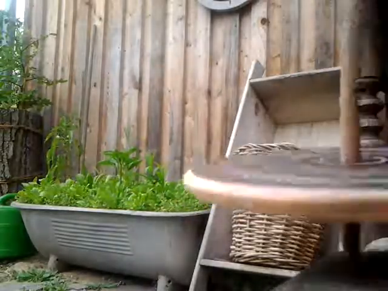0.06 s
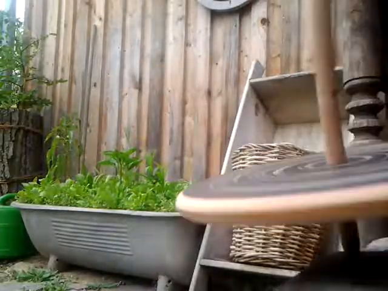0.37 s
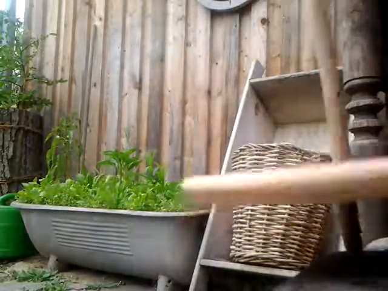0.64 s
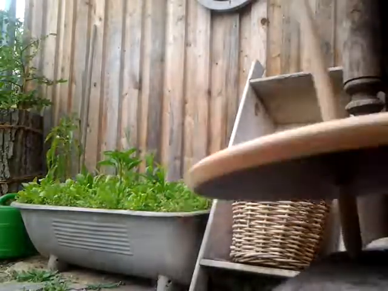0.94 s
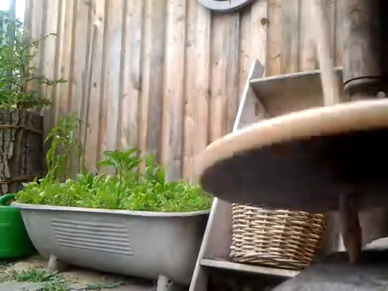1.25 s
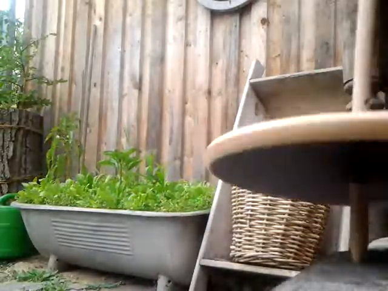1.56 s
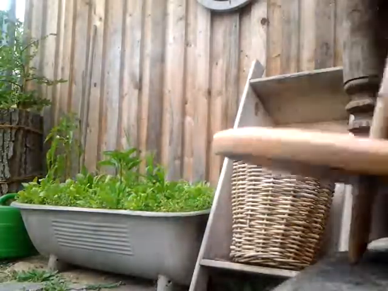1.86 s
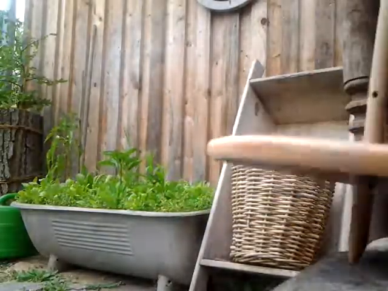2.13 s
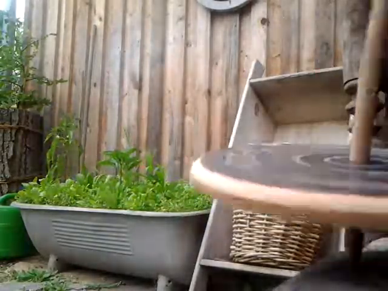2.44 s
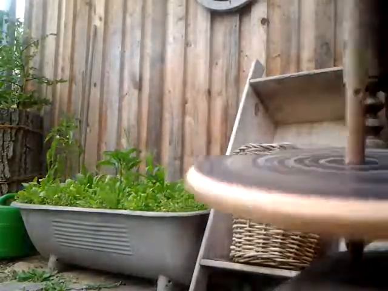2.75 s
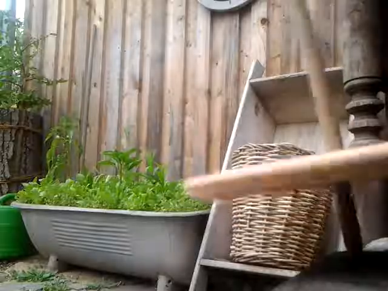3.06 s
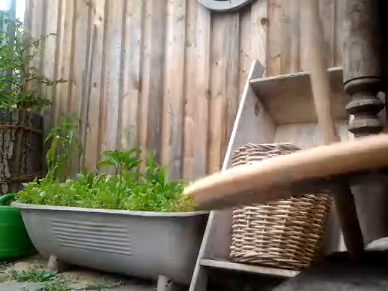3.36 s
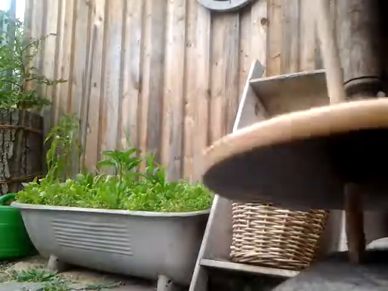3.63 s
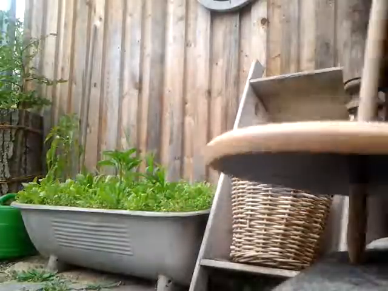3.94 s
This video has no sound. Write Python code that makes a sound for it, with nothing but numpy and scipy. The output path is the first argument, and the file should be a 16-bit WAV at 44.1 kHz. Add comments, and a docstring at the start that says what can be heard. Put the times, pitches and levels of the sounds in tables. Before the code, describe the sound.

Close up in a quiet garden, a spinning wooden top rasps and knocks unevenly on a hollow wooden seat. The knocking gradually eases while the scraping continues, and a faraway bird faintly sings four falling notes.

```python
"""Hollow knocks and a pulsing scrape, close by: a large wooden top wobbles on a wooden garden seat.
Friction over the grain excites the resonances of top and board once or twice a turn, about nine turns
a second. The tip also skips, and each impact rings the board; the knocks thin out as the top settles.
In the quiet air a distant bird whistles once at the start and sings four falling notes near the end."""
import sys
import numpy as np
from scipy import signal
from scipy.io import wavfile
from scipy.ndimage import uniform_filter1d, map_coordinates

SR = 44100
rng = np.random.default_rng(int(sys.argv[2]) if len(sys.argv) > 2 else 0)


def file_out(sig):
    """Save sig as 16-bit WAV at sys.argv[1]."""
    # one column per channel
    cols = np.atleast_2d(sig).T
    # limit, then scale
    lim = np.clip(cols, -1, 1)
    pcm = np.round(lim * 32767).astype(np.int16)
    wavfile.write(sys.argv[1], SR, pcm)


N = 176400
T = np.arange(N) / SR
HZ = np.fft.rfftfreq(8192, 1 / SR)

# Response of the hollow board under the tip: f/Hz, relative level/dB
HOLLOW_RESPONSE = [(150, -30), (290, 0.5), (360, -9.5), (440, -7.5), (535, 4.5), (660, -5), (850, -17.5),
                   (1300, -31.5), (3000, -61)]


def amp(db):
    """Amplitude ratio of a level in decibels."""
    return 10 ** (np.asarray(db) / 20)


def unit(x):
    """Normalisation to an rms of one."""
    return x / np.sqrt(np.mean(x ** 2) + 1e-20)


def add(mix, start, sound):
    """Superposition: a sound joins the mix at its start time."""
    part = mix[max(round(start * SR), 0):][:len(sound)]
    part += sound[:len(part)]


def spectrum(points):
    """Spectral envelope in dB, interpolated over logarithmic frequency."""
    hz, db = np.transpose(points)
    return np.interp(np.log(HZ + 1), np.log(hz), db)


def colour(x, db):
    """Source and filter: x drives a minimum-phase response of unit energy, shaped like db."""
    log_gain = np.log(amp(np.r_[db, db[-2:0:-1]]))
    ring = np.fft.ifft(np.exp(np.conj(signal.hilbert(log_gain)))).real[:len(HZ)]
    return signal.oaconvolve(x, ring / np.linalg.norm(ring))[:len(x)]


def resonate(x, hz, width):
    """Forced vibration of a unit-gain resonator whose tuning follows the curve hz."""
    turn = np.exp(2j * np.pi * np.cumsum(hz) / SR)
    pole = np.exp(-np.pi * width / SR)
    return 2 * (turn * signal.lfilter([1 - pole], [1, -pole], x / turn)).real


def garden_air():
    """Ambient noise: steady, broadband and strongest in the bass."""
    # Spectrum of the air: f/Hz, relative level/dB
    ambience = [(15, 0), (40, 12), (80, -2.5), (170, 1.5), (270, -10), (550, -5), (1200, -9), (3000, -10.5),
                (7000, -33)]
    return amp(-57.5) * colour(rng.standard_normal(N), spectrum(ambience))


def reflections(x, per_s=2000, t60_s=.41):
    """Reverberation: fence and furniture return dense echoes that decay exponentially."""
    t = np.arange(SR // 3) / SR
    taps = rng.standard_normal(len(t)) * (rng.random(len(t)) < per_s / SR)
    taps *= (t > .005) * amp(-60 * t / t60_s)
    return signal.oaconvolve(x, taps / np.linalg.norm(taps))[:N]


def bird(flutter_db=3, flutter_s=.008):
    """Modulated pure tones: a faint whistle of even pitch and four falling glides flutter in level."""
    # Sung notes: onset t/s, level/dB
    notes = [(3.058, -55), (3.222, -52), (3.394, -54), (3.566, -54)]
    # Glide within a note: t/s, nominal f/Hz, relative level/dB
    glide = [(0, 5600, -17), (0.016, 5150, 1), (.032, 4600, 6), (.045, 3950, 2), (.06, 3300, -4),
             (.08, 2850, 3.5), (.11, 2680, -21)]
    # Opening whistle: onset t/s, duration/s, f/Hz, level/dB
    whistle = (.11, .18, 4560, -62)
    times, hz, db = np.transpose(glide)
    t, song = np.arange(0, times[-1], 1 / SR), np.zeros(N)
    for start, level_db in notes:
        pitch = np.interp(t, times, hz) * rng.uniform(.92, 1.01)
        envelope = amp(level_db + np.interp(t, times, db)) * signal.windows.tukey(len(t), .1)
        add(song, start, envelope * np.sin(2 * np.pi * np.cumsum(pitch) / SR))
    start, length, pitch, level_db = whistle
    t = np.arange(0, length, 1 / SR)
    add(song, start, amp(level_db) * np.sin(np.pi * t / length) * np.sin(2 * np.pi * pitch * t))
    flutter = unit(uniform_filter1d(rng.standard_normal(N), round(flutter_s * SR)))
    return song * amp(flutter_db * np.clip(flutter, -2, 1))


def seat_boom(load, width_hz=56.3):
    """Resonance under random forcing: the top's weight on the rough wood sets the seat booming."""
    # Drift of the resonance as the top wanders: t/s, f/Hz
    tuning = [(0, 122.3), (.55, 124.3), (1, 135.5), (1.4, 149.6), (1.8, 167.5), (2.2, 161.3), (2.55, 141),
              (2.9, 130.4), (3.5, 154), (4, 168)]
    hz, drive = np.interp(T, *np.transpose(tuning)), rng.standard_normal(N)
    ring = lambda x: resonate(resonate(x, hz, width_hz), hz, width_hz)
    return amp(-5) * ring(load * drive) / np.std(ring(drive))


def top_response():
    """Modal response in dB: the top's resonances stand out of the broad spectrum of the scrape."""
    # Spectrum of the scrape: f/Hz, relative level/dB
    rasp = [(300, -20.5), (700, -3), (1000, 0.5), (1280, -5), (1550, -1.5), (2400, 1.5), (3300, -2),
            (3800, -2.5), (4550, -7.5), (5000, 3), (5550, -2.5), (6300, -2), (7000, -5.5), (7700, -22)]
    # Modes of the top: f/Hz, width/Hz, lift/dB
    modes = [(1493, 47, 8), (1695, 74, 5.5), (1999, 70, 8), (2365, 46, 9), (2630, 23, 0), (3126, 85, 9.5),
             (3352, 110, 7.5), (5202, 360, 5), (5735, 37, 11.5), (6203, 220, 6)]
    return spectrum(rasp) + sum(db / (1 + (2 * (HZ - hz) / width) ** 2) for hz, width, db in modes)


def moving_contact(x, depth_db=3.5, patch_s=.014, patch_hz=220):
    """Modal coupling varies as the contact travels: bands of the sound come and go at random."""
    frames = signal.stft(x, nperseg=256, noverlap=192)[2]
    band, frame = np.indices(frames.shape)
    position = [band * SR / 256 / patch_hz, frame * 64 / SR / patch_s]
    patches = unit(map_coordinates(rng.standard_normal((128, 512)), position, order=3, mode="mirror"))
    gain = unit(amp(depth_db * np.clip(patches, -2, 2)))
    return signal.istft(frames * gain, nperseg=256, noverlap=192)[1][:N]


def slips(per_s=5800, spread_db=3):
    """Shot noise of friction: tiny slips over the wood grain, a few much larger than the rest."""
    size = amp(spread_db * np.minimum(rng.exponential(1, N), 4))
    return unit(size * rng.choice([-1, 1], N) * (rng.random(N) < per_s / SR))


def swell(peak_s, width_s, fall_ratio=1.85):
    """Power envelope of one drag: a rounded peak that falls more slowly than it rises."""
    u = (T - peak_s) / max(width_s, .002)
    u = np.where(u < 0, u, u / fall_ratio)
    return np.exp(2 - 2 * np.hypot(2 * u, 1))


def scraping(treble_hz=4100, rumble_lag_s=.0033):
    """Sliding friction: each drag rasps in the top, sounds the hollow board and leaves a low rumble."""
    # Drags of the tip: peak t/s, swell time/s, scrape level/dB, treble lift/dB, rumble level/dB
    drags = [(0.019, 0.031, -41.5, -13, -39), (0.065, 0.0086, -38, -5.5, -57),
             (0.099, 0.035, -43.5, -3.5, -39), (0.188, 0.02, -39.5, -1, -37.5),
             (0.237, 0.0061, -36, -19, -29), (0.306, 0.03, -38, -1.5, -32), (0.396, 0.02, -36.5, -3.7, -40),
             (0.491, 0.0023, -21, -3, -54), (0.502, 0.015, -32.5, -6.5, -34.5),
             (0.546, 0.0089, -39.5, 2, -31.5), (0.597, 0.016, -38, -2, -41.5),
             (0.652, 0.025, -43, -1.5, -47), (0.697, 0.0089, -41.5, -3, -41.5),
             (0.766, 0.025, -38.5, 0, -51), (0.863, 0.013, -40.5, -4, -39.5),
             (0.903, 0.012, -36.5, 0.5, -58), (0.977, 0.025, -44.5, -2, -36.5),
             (1.018, 0.0043, -45.4, 6, -47), (1.081, 0.015, -41.5, 3.8, -35),
             (1.187, 0.014, -36.5, -3, -34.5), (1.226, 0.008, -59, 9, -40), (1.286, 0.004, -32, 0, -58),
             (1.297, 0.016, -36.5, -3, -33), (1.299, 0.0059, -41.5, 6.5, -50),
             (1.414, 0.025, -43.5, 1, -37), (1.457, 0.0038, -34, -10, -67),
             (1.512, 0.028, -39.5, -3.5, -46.8), (1.553, 0.0076, -40, -6, -38),
             (1.631, 0.015, -37.5, -4.5, -37.5), (1.689, 0.021, -40, -2, -37.5),
             (1.727, 0.014, -41, 3, -49), (1.779, 0.022, -42, -5, -30), (1.896, 0.024, -42.5, -6, -48),
             (1.943, 0.013, -40.5, 0, -46.1), (1.998, 0.018, -39.5, -4, -36.8),
             (2.115, 0.02, -41.5, -0.5, -40.5), (2.237, 0.012, -38, -2.8, -37), (2.349, 0.009, -41, 4, -39),
             (2.466, 0.011, -38.5, -1, -37.5), (2.567, 0.02, -38, -4, -36.5), (2.695, 0.024, -43, 0.5, -42),
             (2.759, 0.016, -46.5, -0.4, -44), (2.805, 0.014, -42, -1, -37), (2.85, 0.017, -42.5, 0.5, -41),
             (2.917, 0.0085, -37.5, 0.2, -42.5), (2.963, 0.033, -44, -5, -47),
             (3.092, 0.039, -53, 2.6, -52.5), (3.192, 0.021, -43, 0, -47.5), (3.24, 0.008, -46.5, 4, -67),
             (3.311, 0.016, -40, 3, -68), (3.312, 0.003, -36.5, 2, -58), (3.429, 0.045, -46, 0.5, -45),
             (3.558, 0.0027, -32.5, 1, -61), (3.557, 0.042, -47.5, 1.5, -46), (3.65, 0.0067, -37, -15, -55),
             (3.659, 0.025, -46.5, -1.5, -40.5), (3.77, 0.026, -39.5, 1, -47),
             (3.888, 0.0095, -36.5, -5, -39), (4.007, 0.019, -32, -0.5, -58)]
    # Bass response of the board: f/Hz, relative level/dB
    bass_response = [(40, -22.5), (85, -6.5), (120, -7), (160, -8.5), (200, 0.5), (245, -14), (300, -2),
                     (380, -10.5), (900, -45.5)]
    drag, treble, load = np.zeros((3, N))
    for peak, width, db, lift_db, rumble_db in drags:
        power = amp(db) ** 2 * swell(peak, width)
        drag += power
        treble += power * amp(lift_db) ** 2
        load += amp(rumble_db) ** 2 * swell(peak + rumble_lag_s, width * 1.25)
    # Powers become amplitudes; steady contact sets a floor between the drags.
    drag, treble = np.sqrt(np.array([drag, treble]) + amp(-51) ** 2)
    load = np.sqrt(load + amp(-55) ** 2)
    friction = slips() + amp(-9.5) * slips(per_s=160)  # fine grain and coarse specks
    low = signal.sosfiltfilt(signal.butter(4, treble_hz, fs=SR, output="sos"), friction)
    rasp = moving_contact(colour(drag * low + treble * (friction - low), top_response()))
    hollow = colour(np.hypot(amp(-11.5) * drag, amp(-13) * load) * slips(), spectrum(HOLLOW_RESPONSE))
    rumble = colour(load * slips(), spectrum(bass_response))
    return amp(-4.5) * rasp + hollow + amp(-12.5) * rumble + seat_boom(load)


def knocking(rise_s=.0015, hold_s=.0012, board_rise_s=.0029, tick_decay_s=.0095, rattle_decay_s=.009):
    """Impact excitation: each landing knocks, rings the board, ticks in the top and rattles the tip."""
    # Landings of the tip: t/s, relative knock level/dB, knock f/Hz, relative tick level/dB
    landings = [(0.0257, -14.5, 607, -36), (0.0382, -27.8, 825, -56), (0.0912, -12.5, 530, -34),
                (0.1245, -29.1, 524, -55), (0.1912, -23, 514, -37.5), (0.2325, -13, 598, -31),
                (0.2488, -25, 580, -49), (0.3045, -25, 495, -35.5), (0.314, -27, 457, -56),
                (0.3176, -32, 380, -51.5), (0.3331, -32, 397, -56), (0.3457, -18, 500, -42.7),
                (0.3563, -20.5, 546, -53), (0.3684, -26, 556, -56.5), (0.3746, -23.5, 436, -42),
                (0.4995, -27, 520, -44), (0.5477, -21, 546, -40), (0.8648, -28, 563, -56),
                (0.9748, -18.5, 586, -47), (1.0831, -20, 590, -39), (1.1909, -22.5, 626, -49.5),
                (1.299, -23.5, 596, -37), (1.3977, -22, 564, -50), (1.4052, -26.5, 580, -43),
                (1.409, -32, 520, -45), (1.4339, -28, 590, -60), (1.4413, -30.5, 567, -52),
                (1.6265, -29.5, 540, -43.5), (1.7798, -16, 627, -40.5), (1.7885, -24.5, 536, -56),
                (1.7989, -19, 610, -53), (1.809, -21.5, 600, -48), (2, -18.5, 588, -41.5),
                (2.0085, -23.5, 602, -57), (2.0182, -24.8, 465, -58.5), (2.0259, -22.5, 640, -50),
                (2.1137, -24.5, 540, -46), (2.122, -54, 454, -43), (2.2391, -25.5, 550, -43.5),
                (2.2784, -29, 564, -48), (2.3515, -29.5, 470, -54), (2.3591, -25.5, 444, -44),
                (2.3926, -32.5, 486, -60), (2.4673, -28.5, 514, -53), (2.4743, -30, 450, -53),
                (2.5682, -32.5, 500, -54), (2.7987, -28.5, 505, -40), (2.8051, -29.4, 473, -53.4),
                (2.852, -34, 520, -59.8), (2.9555, -29.5, 515, -52), (3.118, -36.5, 540, -52.0),
                (3.422, -27.5, 572, -43.5)]
    # Modes of the board: f/Hz, relative level/dB, T60/s
    modes = [(130.2, -29, .2), (193.4, -27.5, 0.072), (245.4, -23, 0.058), (292, -21.5, 0.067),
             (405, -18.5, 0.087), (537.3, -17, .1), (717, -20.5, .1), (818, -25, .07), (948.5, -25.5, 0.14),
             (1120, -28.5, 0.089), (1485, -29, 0.058), (2260, -38, .05)]
    t = np.arange(SR // 4) / SR
    rise = np.sin(np.pi / 2 * np.minimum(t / rise_s, 1)) ** 2

    def mode(hz, db, t60):
        """Damped free vibration after a brief rise and hold."""
        envelope = rise * amp(db - 60 * np.maximum(t - rise_s - hold_s, 0) / t60)
        return envelope * np.cos(2 * np.pi * hz * (t - rise_s))

    rings = np.array([mode(*row) for row in modes]) * (1 - np.exp(-t / board_rise_s))
    octaves = np.log2(np.array(modes)[:, 0] / 550)
    knocks, ticks, rattle = np.zeros((3, N))
    for start, db, hz, tick_db in landings:
        tilt_db_per_octave = .52 * (db + 14)  # harder blows ring brighter
        board = amp(tilt_db_per_octave * octaves - 1.47) @ rings
        add(knocks, start, amp(db) * (mode(hz, db=-2.5, t60=.02) + board))
        add(ticks, start, amp(tick_db - .5) * rise * np.exp(-t / tick_decay_s))
        add(rattle, start, amp(db - 26) * rise * np.exp(-t / rattle_decay_s))
    lowpass_db = -10 * np.log10(1 + (HZ / 2800) ** 4)
    ticking = moving_contact(colour(ticks * slips(), top_response() + lowpass_db))
    return knocks + ticking + colour(rattle * slips(), spectrum(HOLLOW_RESPONSE))


def scene():
    """Direct and reflected sound add in the garden: the near top is almost dry, the far bird echoes."""
    top, song, air = scraping() + knocking(), bird(), garden_air()
    echoes = reflections(amp(-26) * top + amp(-2.5) * song)
    return (top + song + echoes + air)[None]


def record(dry, cutoff_hz=7850, offset=.026):
    """Band limiting: a steep low-pass removes the high treble, and a small constant offset is added."""
    lowpass = signal.firwin(201, cutoff_hz, window=("kaiser", 9), fs=SR)
    return offset + signal.oaconvolve(dry, lowpass[None], "same")


dry = scene()
out = record(dry)
file_out(out)
```